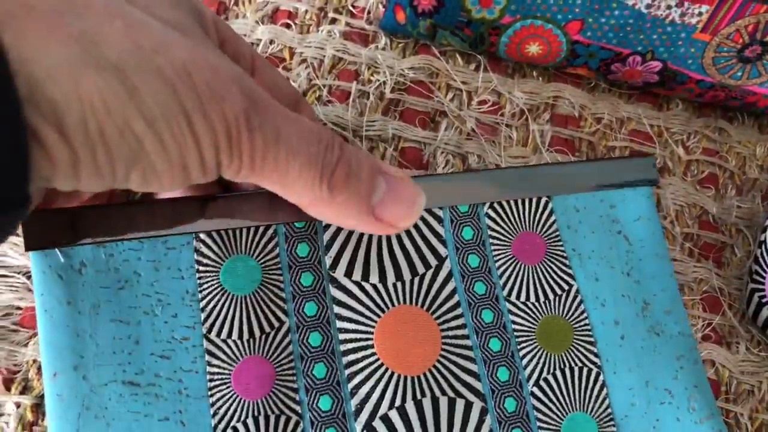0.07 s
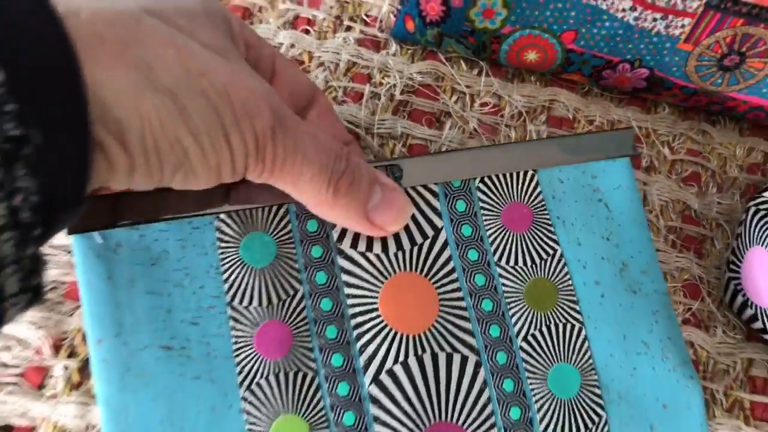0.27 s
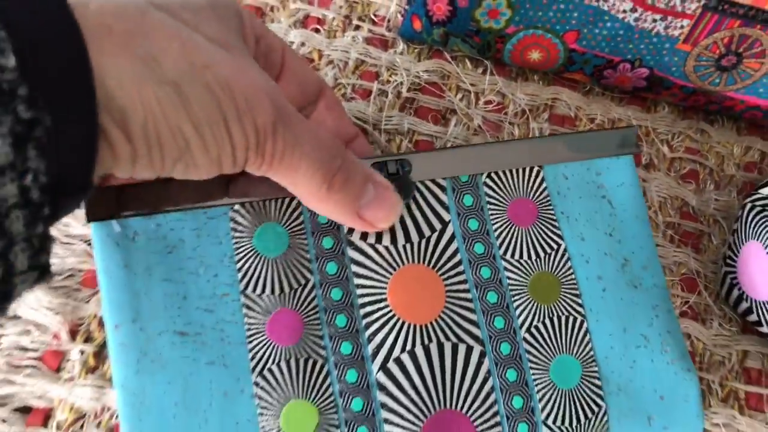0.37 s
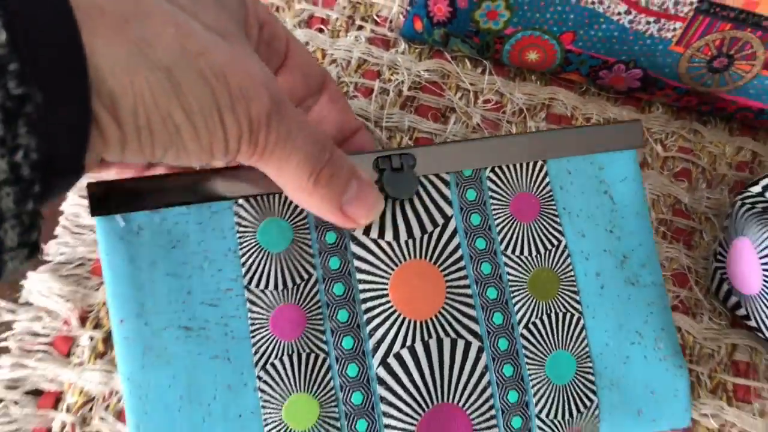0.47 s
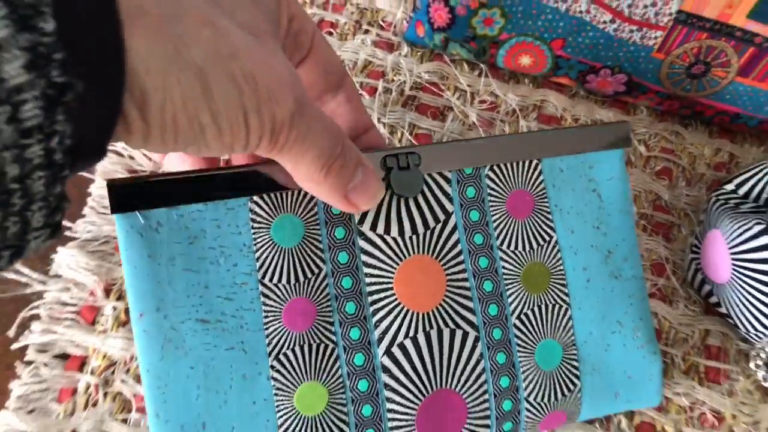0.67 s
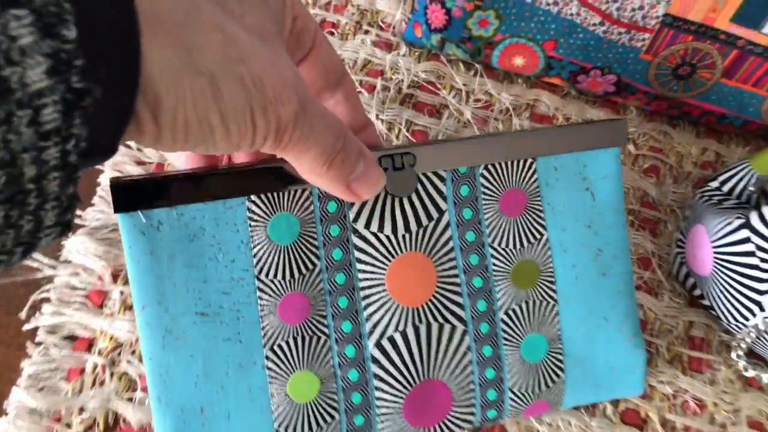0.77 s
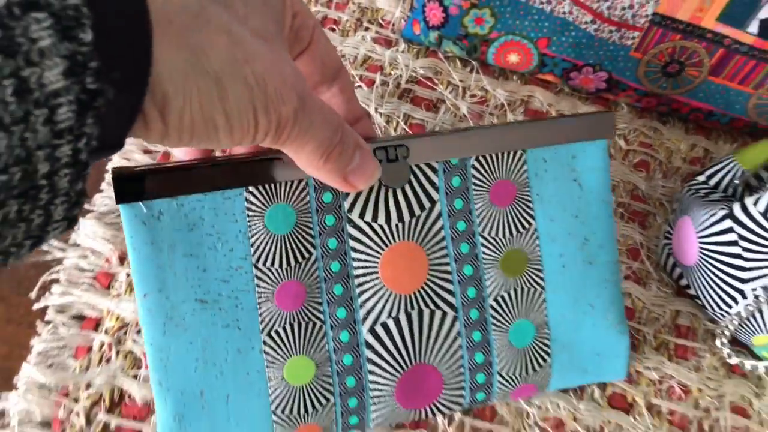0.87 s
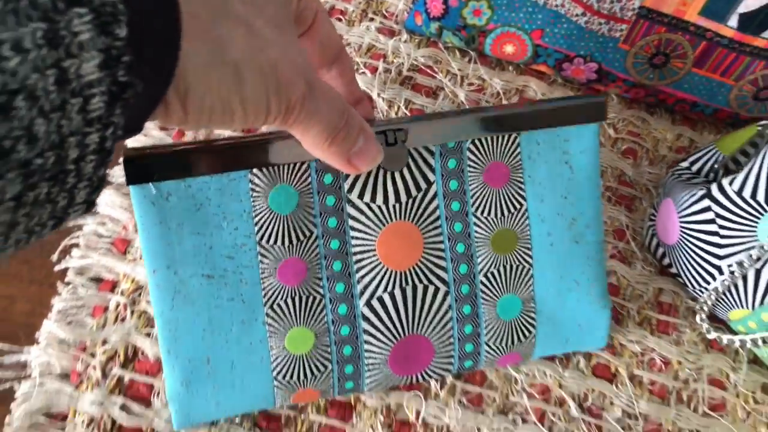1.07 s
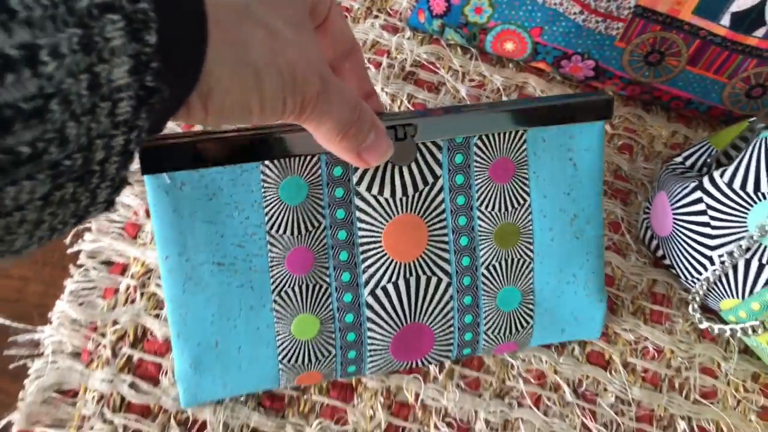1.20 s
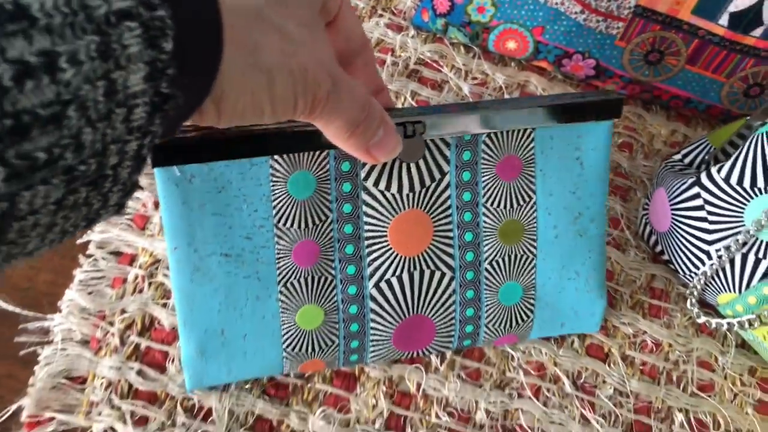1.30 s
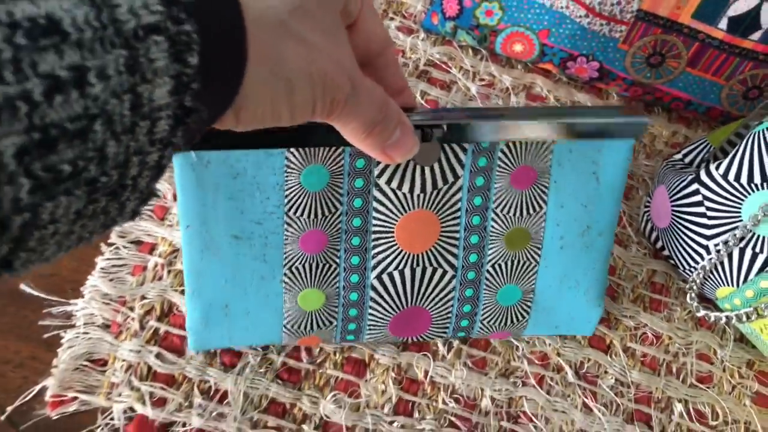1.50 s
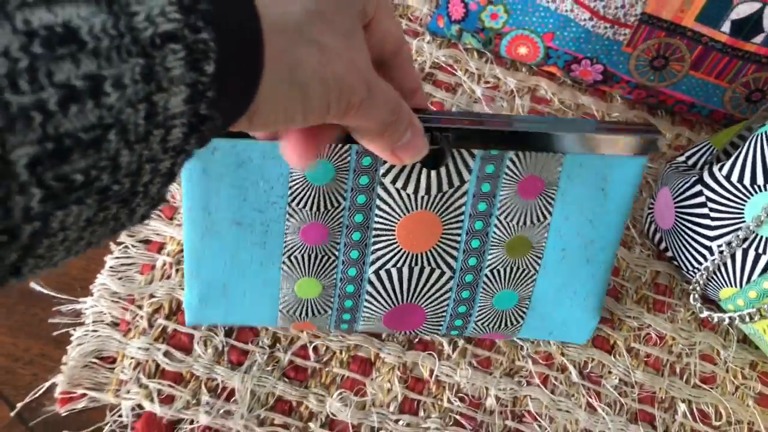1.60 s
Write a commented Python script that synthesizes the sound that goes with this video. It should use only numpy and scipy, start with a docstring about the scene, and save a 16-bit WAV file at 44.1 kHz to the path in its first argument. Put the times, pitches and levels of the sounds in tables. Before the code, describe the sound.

One sharp metallic click as a thumb presses a wallet's clasp, with faint handling rustle.

```python
"""A quiet room: a thumb presses the metal clasp of a wallet. The catch gives with a faint scrape, rides
over its lip, snaps home and chatters for a few milliseconds while the flexed frame knocks.
The room rings briefly. A soft hiss follows, with tiny ticks around its end.
Faint rustles come and go over a low room rumble."""
import sys
import numpy as np
from scipy import signal
from scipy.fft import rfft, irfft
from scipy.io import wavfile

SR = 44100
rng = np.random.default_rng(int(sys.argv[2]) if len(sys.argv) > 2 else 0)


def file_out(sig):
    """Save sig as 16-bit WAV at sys.argv[1]."""
    # one column per channel
    cols = np.atleast_2d(sig).T
    # limit, then scale
    lim = np.clip(cols, -1, 1)
    pcm = np.round(lim * 32767).astype(np.int16)
    wavfile.write(sys.argv[1], SR, pcm)


N = 72765
T = np.arange(N) / SR

# steel catch modes (frequency [Hz], level [dB], t60 [s])
CATCH_MODES = [(2600, -21, .012), (3620, -22, .0105), (4050, -24, .008), (4710, -15.5, .0098),
               (5510, -20.5, .012), (6420, -14.5, .0062), (7030, -24.5, .012), (8580, -29, .0105),
               (10131, -31, .0059), (12070, -28, .0066), (13120, -24.5, .011), (13900, -20.5, .0075),
               (14600, -26, .007), (15400, -26, .0078)]
# catch contacts (time [s], level [dB])
CATCH_STRIKES = [(0.2107, -35), (0.2125, -40), (0.21514, -17), (0.21566, -11), (0.21713, -21),
                 (0.21799, -10), (0.21847, 4), (0.21944, -8), (0.22044, -17), (0.22153, -22)]
def catch(crack_db=-27, crack_t60_s=.005, highpass_hz=3000):
    """The catch snaps home and chatters; each steel-on-steel contact rings it and adds a gritty crack."""
    strikes = impulses(CATCH_STRIKES)
    grit = convolve(strikes, decay(crack_t60_s)) * rng.standard_normal(N)
    crack = from_db(crack_db) * filtered(grit, highpass_hz, "high")
    ring = convolve(strikes, ringing(CATCH_MODES))
    return filtered(ring, highpass_hz, "high", order=4) + crack


# hand-damped frame and pouch modes; two linger faintly (frequency [Hz], level [dB], t60 [s])
FRAME_MODES = [(52, -56, .08), (160, -46, .04), (320, -24, .02), (568, -14, .0145), (900, -12, .023),
               (970, -14, .027), (990, -49, .52), (1046, -47.5, .52), (1255, -31, .024), (1518, -26, .015),
               (1865, -18.5, .022)]
# frame knocks (time [s], level [dB])
FRAME_KNOCKS = [(0.21075, -20), (0.2118, -23), (0.2158, -12), (0.21695, -11), (0.2187, -1.5),
                (0.22016, -11)]
def frame(lowpass_hz=2000):
    """The metal frame flexes and is let go; thumb and padding dull its knock."""
    ring = convolve(impulses(FRAME_KNOCKS), ringing(FRAME_MODES))
    return filtered(ring, lowpass_hz, "low", order=6)


# scrape spectrum (frequency [Hz], relative density [dB])
SCRAPE_SPECTRUM = [(200, -16), (500, -5), (780, 2), (1300, -11), (2500, -18), (4300, -13), (6000, -23),
                   (15000, -36)]
def scrape(start_s=.187, level_db=-52.5, t60_s=.07):
    """The catch scrapes faintly as it starts to move."""
    return from_db(level_db) * decay(t60_s, start_s) * noise(SCRAPE_SPECTRUM)


# reflections (delay [s], gain [dB])
WALL_ECHOES = [(.0089, -26), (.0128, -24), (.0184, -29)]
def echoes(source, lowpass_hz=6000):
    """Nearby surfaces return dull copies of the source."""
    return convolve(source, filtered(impulses(WALL_ECHOES), lowpass_hz, "low"))


# tail spectrum (frequency [Hz], relative density [dB])
TAIL_SPECTRUM = [(60, -10), (170, -9), (360, -12), (580, -2), (760, -6), (900, -1), (1030, 0), (1180, -8),
                 (1850, -7), (2250, -22), (3000, -21), (3500, -14), (4100, -19), (4700, -14), (6400, -15),
                 (8000, -19), (10500, -26), (13500, -23), (15800, -27)]
# room decay (frequency [Hz], t60 [s])
TAIL_T60 = [(100, .4), (500, .45), (1000, .57), (2500, .52), (6000, .52), (15000, .42)]
def room_tail(start_s=.2235, level_db=-43.5, scatter_re_tail_db=5, scatter_t60_s=.07):
    """Diffuse ring after the snap: quick scatter from furniture over noise that dies band by band."""
    diffuse = rfft(noise(TAIL_SPECTRUM))
    hz = np.arange(len(diffuse)) * SR / N
    edges_hz = np.geomspace(30, 17000, 13)
    scatter = from_db(scatter_re_tail_db) * decay(scatter_t60_s, start_s)
    tail = np.zeros(N)
    for low, high in zip(edges_hz, edges_hz[1:]):
        band = irfft(diffuse * (hz >= low) * (hz < high), N)
        t60_s = at_hz(TAIL_T60, np.sqrt(low * high))
        tail += band * (decay(t60_s, start_s) + scatter)
    return from_db(level_db) * tail


# hiss spectrum (frequency [Hz], relative density [dB])
HISS_SPECTRUM = [(100, 0), (300, 6), (700, 3), (1500, 0), (3000, 1), (4400, 1), (5200, -3), (9000, -3.5),
                 (15500, -6)]
def hiss(start_s=.23, rise_s=.25, release_s=.62, fall_s=.011, level_db=-60.3):
    """A soft hiss swells under the dying click and stops short."""
    rise = np.clip((T - start_s) / rise_s, 0, 1)
    fall = np.clip(1 - (T - release_s) / fall_s, 0, 1)
    return from_db(level_db) * rise * fall * noise(HISS_SPECTRUM)


# ticks (time [s], level [dB])
TICK_EVENTS = [(.531, -51), (.549, -50), (.579, -46), (.6355, -44.5), (.6715, -49), (.7515, -54)]
def ticks(t60_s=.0012, highpass_hz=1800):
    """Tiny dry noise bursts around the end of the hiss."""
    envelope = convolve(impulses(TICK_EVENTS), decay(t60_s))
    return filtered(envelope * rng.standard_normal(N), highpass_hz, "high")


# rustles (start [s], length [s], upper resonance [Hz], upper level [dB], lower level [dB], broad level [dB])
RUSTLE_EVENTS = [(-.04, .22, 4100, -71, -76, -77), (.42, .14, 4350, -69, -80, -80),
                 (.62, .2, 4000, -80, -80, -72), (.93, .24, 3800, -75, -76, -80),
                 (1.22, .17, 3900, -71.5, -73, -79), (1.47, .28, 3900, -75, -75, -69.5)]
# broad noise spectrum (frequency [Hz], relative density [dB])
RUSTLE_SPECTRUM = [(300, -4), (1000, 0), (3000, -3), (6000, -9), (15000, -12)]
def rustles(lower_hz=3080, width_hz=280, rise_share=.4):
    """Faint swells: two narrow resonances in broad noise."""
    lower = resonant_noise(lower_hz, width_hz)
    broad = noise(RUSTLE_SPECTRUM)
    out = np.zeros(N)
    for start_s, length_s, upper_hz, upper_db, lower_db, broad_db in RUSTLE_EVENTS:
        corners_s = [start_s, start_s + rise_share * length_s, start_s + length_s]
        swell = np.sqrt(np.interp(T, corners_s, [0, 1, 0]))
        upper = resonant_noise(upper_hz, width_hz)
        out += swell * (from_db(upper_db) * upper + from_db(lower_db) * lower + from_db(broad_db) * broad)
    return out


# background spectrum (frequency [Hz], relative density [dB])
RUMBLE_SPECTRUM = [(12, -28), (25, -15), (42, -5), (64, -1), (85, -5), (118, -8), (154, 0), (210, -9),
                   (280, -9), (360, -13), (480, -20), (1000, -21), (1500, -25), (2000, -24), (2500, -27),
                   (3100, -25), (4100, -26), (4900, -30), (8000, -32), (10500, -34), (13000, -33),
                   (15800, -34)]
def room_rumble(level_db=-64.3):
    """Steady low rumble with a trace of hiss."""
    return from_db(level_db) * noise(RUMBLE_SPECTRUM)


def from_db(db):
    """Decibels to gain."""
    return 10 ** (np.asarray(db) / 20)


def unit_rms(x):
    """Scale to rms 1."""
    return x / np.sqrt(np.mean(x ** 2) + 1e-20)


def at_hz(points, hz):
    """Interpolate a table over log frequency."""
    table_hz, values = np.transpose(points)
    return np.interp(np.log(np.maximum(hz, 1)), np.log(table_hz), values)


def filtered(x, hz, kind, order=2):
    """Butterworth filter."""
    return signal.sosfilt(signal.butter(order, hz, kind, fs=SR, output="sos"), x + 1e-18)


def noise(spectrum):
    """Steady coloured noise, rms 1."""
    gain = from_db(at_hz(spectrum, np.arange(N // 2 + 1) * SR / N))
    return unit_rms(irfft(rfft(rng.standard_normal(N)) * gain, N))


def resonant_noise(hz, width_hz):
    """Noise through one resonance, rms 1."""
    radius = np.exp(-np.pi * width_hz / SR)
    feedback = [1, -2 * radius * np.cos(2 * np.pi * hz / SR), radius ** 2]
    return unit_rms(signal.lfilter([1, 0, -1], feedback, rng.standard_normal(N)))


def decay(t60_s, start_s=0):
    """Envelope falling 60 dB per t60_s from start_s."""
    return (T >= start_s) * np.exp(-np.log(1000) * np.maximum(T - start_s, 0) / t60_s)


def impulses(events):
    """One impulse per (time [s], level [dB]), placed between samples by a short sinc."""
    times_s, levels_db = np.transpose(events)
    lag = np.arange(N) - times_s[:, None] * SR
    return from_db(levels_db) @ (np.sinc(lag) * np.sinc(lag / 8) * (np.abs(lag) < 8))


def convolve(x, response):
    """Apply an impulse response."""
    return signal.fftconvolve(x, response)[:N]


def ringing(modes):
    """Struck-body response: a sum of decaying tones."""
    return sum(from_db(db) * decay(t60_s) * np.cos(2 * np.pi * hz * T) for hz, db, t60_s in modes)


def scene():
    """Mono mix: clasp, room response, small sounds, rumble."""
    snap = catch() + frame()
    mix = snap + scrape() + echoes(snap) + room_tail() + hiss() + ticks() + rustles() + room_rumble()
    return mix[None]


def record(dry, ceiling=.74, cutoff_hz=16000):
    """Soft peak limiter, then a steep low-pass."""
    limited = dry / (1 + (dry / ceiling) ** 8) ** (1 / 8)
    return signal.sosfilt(signal.ellip(10, .2, 80, cutoff_hz, fs=SR, output="sos"), limited)


dry = scene()
out = record(dry)
file_out(out)
```